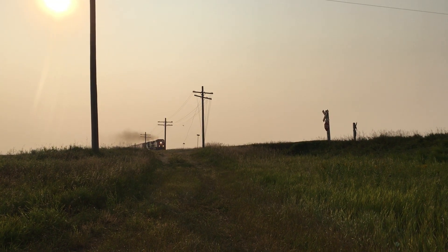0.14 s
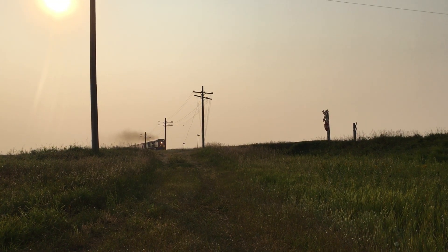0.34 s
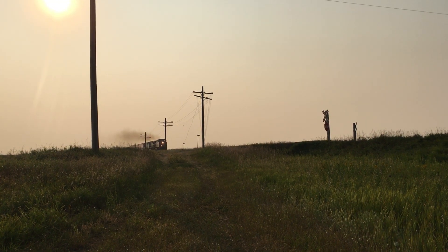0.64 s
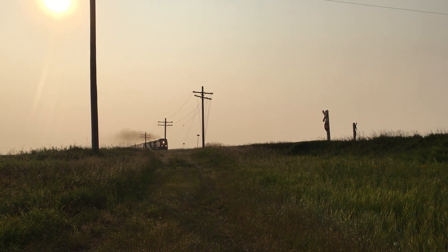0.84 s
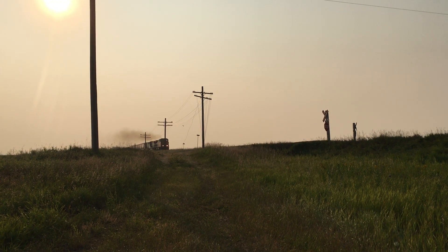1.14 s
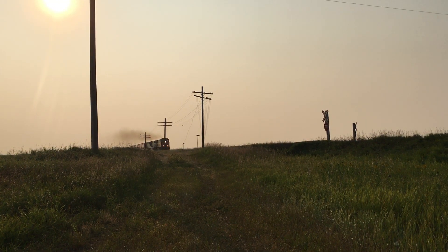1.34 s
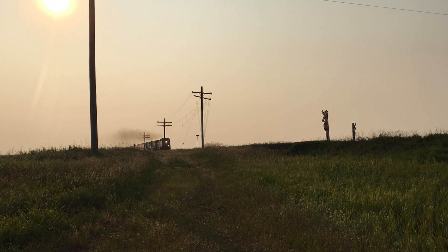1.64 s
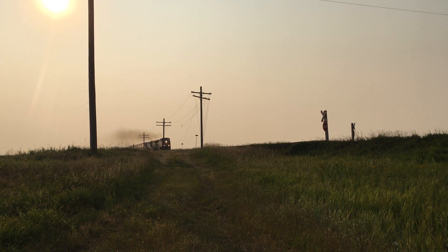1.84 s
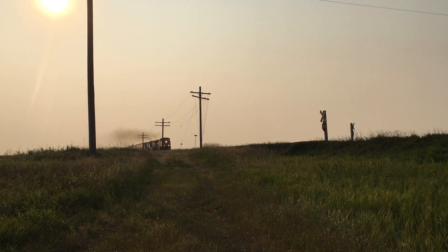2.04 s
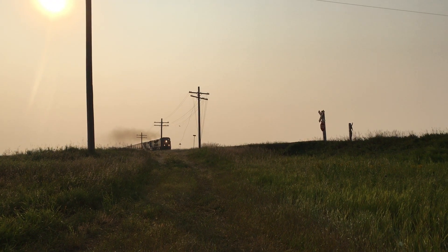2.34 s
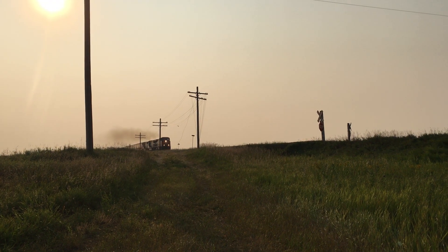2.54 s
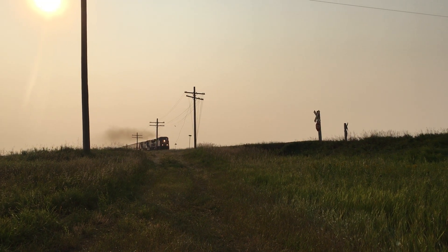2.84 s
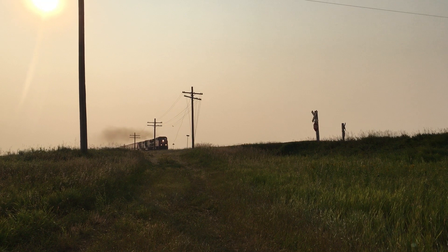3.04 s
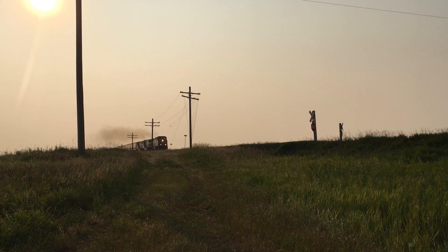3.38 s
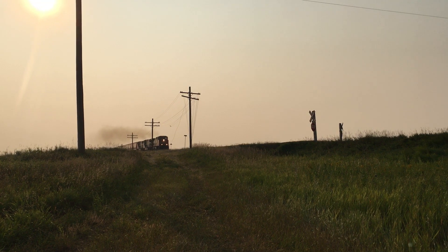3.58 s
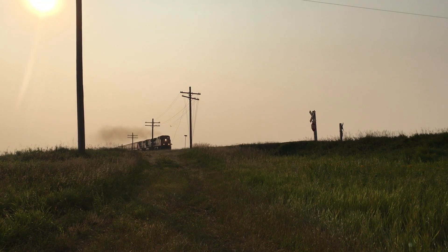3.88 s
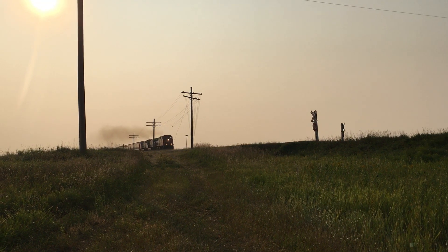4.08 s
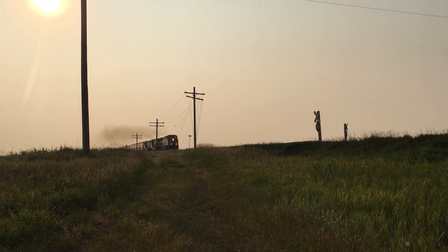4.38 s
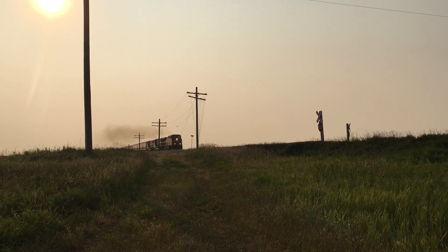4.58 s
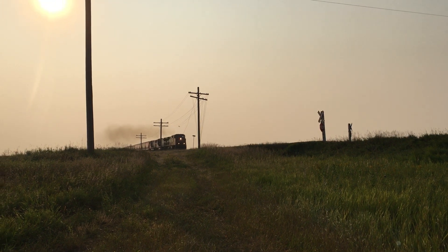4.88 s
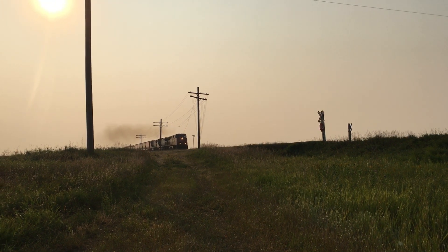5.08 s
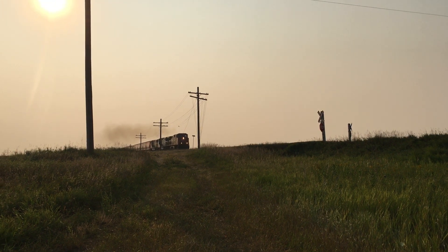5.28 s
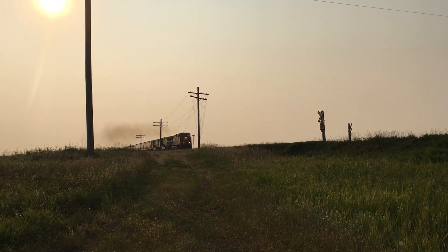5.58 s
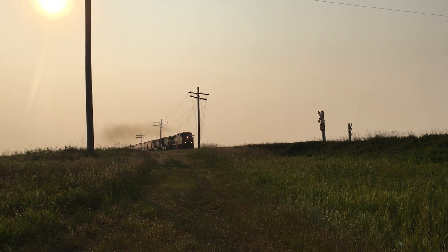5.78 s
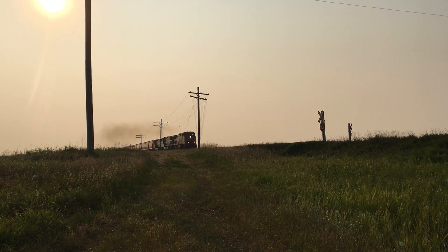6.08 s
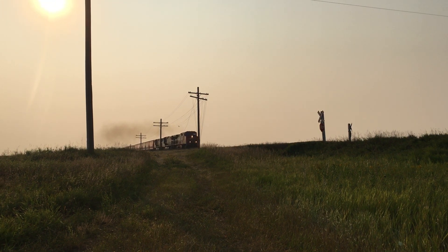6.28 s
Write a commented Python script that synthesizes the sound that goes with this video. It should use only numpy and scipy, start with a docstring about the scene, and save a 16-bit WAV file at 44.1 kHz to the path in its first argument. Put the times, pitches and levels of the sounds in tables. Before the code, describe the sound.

Deep pulsing locomotive drone and growing rail hiss approach over a field with faint insects, capped by a single echoing chord from an air horn.

```python
"""A throbbing diesel freight train nears over open grassland and sounds one blast of its three-chime horn.
The exhaust pattern repeats nine times a second as a comb of tones under roar; the drive whines faintly.
Filtered noise makes the wheel hiss on the rails and the gusts over the grass.
The horn is three rows of overtones plus rushing air, echoing off the train and the land.
Insects buzz in the grass as chopped high noise, and something ticks once close to the microphone."""
import sys
import numpy as np
from scipy import signal
from scipy.fft import rfft, irfft, next_fast_len
from scipy.io import wavfile

SR = 44100
rng = np.random.default_rng(int(sys.argv[2]) if len(sys.argv) > 2 else 0)


def log_audio(samples):
    """Write samples as a 16-bit WAV file to the path given in sys.argv[1]."""
    # one column per channel
    frames = np.atleast_2d(samples).T
    # limit to full scale, then quantise
    limited = np.clip(frames, -1, 1)
    pcm = np.round(limited * 32767).astype(np.int16)
    wavfile.write(sys.argv[1], SR, pcm)


N = 283122


def from_db(db):
    """Decibels to gain."""
    return 10 ** (np.asarray(db) / 20)


def rms_one(x):
    """Scale to an rms of 1."""
    return x / np.sqrt(np.mean(x ** 2) + 1e-20)


def seconds():
    """The time of every sample."""
    return np.arange(N) / SR


def ramp(start_s, length_s):
    """A straight rise from 0 to 1."""
    return np.clip((seconds() - start_s) / length_s, 0, 1)


def swells(rows):
    """Smooth bumps of level, in dB."""
    return sum(db * bump(s, half_s) for s, half_s, db in rows)


def bump(centre_s, half_s):
    """A bell-shaped rise and fall with a peak of 1."""
    return np.exp(-((seconds() - centre_s) / half_s) ** 2 / 2)


def drift(rate):
    """Slow chance with a spread of 1; a higher rate wanders faster."""
    pole = np.exp(-200 * np.pi * rate / SR)
    # drawn once per 100 samples, after a run-in
    draws = rng.standard_normal(N // 100 + 2002)
    slow = signal.lfilter([1], [1, -2 * pole, pole * pole], draws)[2000:]
    return np.interp(np.arange(N) / 100, np.arange(len(slow)), rms_one(slow))


def noise(colour):
    """Noise with the given spectrum, rms 1."""
    hz, db = np.transpose(colour)
    size = next_fast_len(N)
    bins_hz = np.maximum(np.arange(size // 2 + 1) * SR / size, 1)
    gain = from_db(np.interp(np.log(bins_hz), np.log(hz), db))
    return rms_one(irfft(rfft(rng.standard_normal(size)) * gain, size)[:N])


def cut(x, hz, kind, order=2):
    """Butterworth low- or high-pass."""
    return signal.sosfilt(signal.butter(order, min(hz, SR / 2 - 1), kind, fs=SR, output="sos"), x)


def ring(clicks, hz, t60):
    """A unit click sets a decaying sine of starting height 1 ringing."""
    r, w = from_db(-60 / (t60 * SR)), 2 * np.pi * hz / SR
    return signal.lfilter([0, np.sin(w)], [1, -2 * r * np.cos(w), r * r], clicks + 1e-18)


def delayed(x, lag_s):
    """The sound after a travel time that may change."""
    return np.interp(seconds() - lag_s, seconds(), x, left=0)


# the train closes in on the microphone at a steady speed
START_DISTANCE_M, SPEED_M_PER_S = 307, 21.6


def nearness_db():
    """Level gained since the start as the distance shrinks."""
    distance_m = np.maximum(START_DISTANCE_M - SPEED_M_PER_S * seconds(), 10)
    return 20 * np.log10(START_DISTANCE_M / distance_m)


# the engine cycle is steady, then picks up very slightly
CYCLE_HZ, PICKUP_AT_S, PICKUP_HZ_PER_S = 9.01, 4.0, .017


def engine_cycles():
    """Engine cycles counted since the start."""
    return np.cumsum(CYCLE_HZ + PICKUP_HZ_PER_S * np.maximum(seconds() - PICKUP_AT_S, 0)) / SR


# level at the start distance, and the dB gained per dB of nearness
THROB_DB, THROB_GROWTH = -33.5, 0.15
BARK_DB, BARK_GROWTH = -44, 1.14
# the bark and roar open up as the train clears the rise
BARK_IN_VIEW_DB, BARK_OPENS_S, BARK_OPENS_TAKES_S = 3, 4.97, 0.73
# the roar builds up: its level against the bark half way, and the whole rise
ROAR_MID_DB, ROAR_RISE_DB, ROAR_BUILD_S = -2, 5, 2.76
# the drone is centred on one multiple of the engine cycle, and this many multiples wide
DRONE_MULTIPLE, DRONE_WIDTH = 11, 1.8
# exhaust lines: multiple (of the engine cycle), level_db
ENGINE_ORDERS = [(4, -38), (5, -13), (6, -25.5), (7, -14), (8, 1.5), (9, -12.5), (10, -11), (11, 0.5),
                 (12, -1.5), (13, -4.5), (14, -24), (15, -11), (16, -4), (17, -8.5), (18, -31), (19, -9.5),
                 (20, -4), (21, -11.5), (22, -9.5), (23, -8), (24, -8.5), (25, -15.5), (26, -8.5),
                 (27, -11), (28, -7), (29, -4.5), (30, -7.5), (31, -22), (32, -29), (33, -23), (34, -6),
                 (35, -13.5), (36, -18)]
# exhaust strokes that stand out in each cycle: place (in the cycle, 0-1), level_db
STROKES = [(.063, -5), (.392, -5.5), (.472, -1.8), (.799, -.4), (.83, -5.6)]
# turbulence at the stacks: pitch_hz, level_db (per Hz)
ROAR_COLOUR = [(25, -39), (45, 5.5), (75, -2), (110, -0.5), (150, -5.5), (220, 0.5), (290, -0.5), (340, -8),
               (420, -13.5), (470, -22.5), (540, -21.5), (610, -20), (690, -26.5), (800, -41.5),
               (1300, -64)]
# the drone is weak at first and swells before the horn: centre_s, half_length_s, level_db
DRONE_SWELLS = [(.6, 1.0, -2), (3.65, 0.55, 2.5)]


def engine(waver_db=0.37, wobble=0.17, bark_wobble=0.37, spread=0.036, chuff=0.31, puff_width=0.07):
    """Unequal strokes repeat every cycle: a comb of lines, with a puff of roar on each stroke."""
    cycles = engine_cycles()
    places, strengths_db = np.transpose(STROKES)
    throb, bark = 0, 0
    for multiple, db in ENGINE_ORDERS:
        # the strokes set the timing of each line, the silencer sets its level
        turns = np.exp(-2j * np.pi * multiple * places)
        timing = np.angle(np.sum(from_db(strengths_db) * turns))
        gain = from_db(db + waver_db * drift(0.81))
        phase = 2 * np.pi * multiple * cycles + timing
        if multiple < 15:
            # the silencer smears the deep thumps into a drone
            in_drone = np.exp(-((multiple - DRONE_MULTIPLE) / DRONE_WIDTH) ** 2)
            swell = from_db(swells(DRONE_SWELLS) * in_drone)
            smeared = phase + spread * (multiple - 11) ** 2 + wobble * drift(0.88)
            throb = throb + gain * swell * np.cos(smeared)
        else:
            # the bark differs a little from one cycle to the next
            bark = bark + gain * np.cos(phase + bark_wobble * drift(4.6))
    puffs = 0
    for place, db in STROKES:
        from_stroke = (cycles - place + .5) % 1 - .5
        puffs = puffs + from_db(db) * np.exp(-(from_stroke / puff_width) ** 2 / 2)
    roar_db = ROAR_MID_DB + ROAR_RISE_DB * (ramp(0, ROAR_BUILD_S) - 0.5)
    roar = rms_one(noise(ROAR_COLOUR) * (1 + chuff * puffs)) * from_db(roar_db)
    near_db = nearness_db()
    throb_db = THROB_DB + THROB_GROWTH * near_db
    opening_db = BARK_IN_VIEW_DB * ramp(BARK_OPENS_S, BARK_OPENS_TAKES_S)
    bark_db = BARK_DB + BARK_GROWTH * near_db + opening_db
    return from_db(throb_db) * rms_one(throb) + from_db(bark_db) * (rms_one(bark) + roar)


# turbulence frays the overtones: phase noise (radians per octave above the second partial), its speed
HAZE_PER_OCTAVE, HAZE_HZ = .125, 70
# the overtones die away on a curve of this power as the valve closes
OVERTONE_FADE_POWER = 1.46
# upper edges of the registers body, steady octaves, blare, bite and brass; the edge lies above: pitch_hz
REGISTER_EDGES_HZ = [550, 900, 1400, 1750, 3100]


def chime(pitch_hz, level_db, closed, registers_db, overtones, jitter=0.00054, shimmer_db=3.0,
          top_fall_db=-1.28, smear=1.26, count=22):
    """One diaphragm and bell: a train of puffs whose high overtones shimmer in the turbulent air."""
    on = (seconds() > VALVE_OPEN_S) & (closed < 1)
    phase = 2 * np.pi * np.cumsum(pitch_hz * (1 + jitter * drift(28)))[on] / SR
    multiples, levels_db = np.transpose(overtones)
    out = np.zeros(N)
    for k in range(1, count):
        register = np.searchsorted(REGISTER_EDGES_HZ, k * pitch_hz[on].mean())
        # beyond the listed overtones the level falls steadily
        db = np.interp(k, multiples, levels_db) + top_fall_db * max(k - len(levels_db), 0)
        shimmer = shimmer_db * np.log2(k) / 2 * drift(8.8)[on]
        db = db + level_db[on] + registers_db[register][on] + shimmer
        # as the valve closes the fundamental holds on longer than its overtones
        if k == 1:
            flow = np.cos(np.pi / 2 * closed[on]) ** 2
        else:
            flow = (1 - closed[on]) ** OVERTONE_FADE_POWER
        haze = HAZE_PER_OCTAVE * max(np.log2(k) - 1, 0) * drift(HAZE_HZ)[on]
        wave = np.sin(k * phase + smear * rng.standard_normal() + haze)
        out[on] += np.sqrt(2) * flow * from_db(db) * wave
    return out


VALVE_OPEN_S, VALVE_SHUT_S = 4.32, 5.49
# air pressure in the horn: it starts low, builds up, and bleeds away as the valve closes
PRESSURE_START_DB, PRESSURE_BUILD_S, BLEED_S = -7.0, 0.13, 0.2795
# every chime starts sharp by this share of its pitch, then settles
ONSET_SHARP = .022
# the last of the air bends the chimes, the high one most
LAST_AIR_S, LAST_AIR_TAKES_S = 5.28, 0.18
# the body (the fundamentals) fills in through the blast
BODY_START_DB, BODY_BUILD_S = -1.5, 1
# the upper registers at full pressure before their swells, and the dB gained per dB of pressure
BLARE_DB, BLARE_FOLLOWS = -8.5, 0.12
BITE_DB, BITE_FOLLOWS = -4, 0.2
BRASS_DB, BRASS_FOLLOWS = -2.5, 1
EDGE_DB, EDGE_FOLLOWS = -4.4, 1
# low, middle and high chime: pitch_hz, level_db, speaks_s, fades_from_s, silent_s, settling_s,
# shift as the air bleeds away (share of pitch), shift on the last of the air (share of pitch)
CHIMES = [(324.4, -28, 4.33, 5.22, 5.54, .135, -.013, 0),
          (380, -36.5, 4.339, 5.14, 5.545, .11, -.004, 0.00061),
          (493.3, -37.5, 4.353, 5.13, 5.51, .15, -0.018, 0.029)]
# overtones of each chime: multiple (of its pitch), level_db
LOW_CHIME = [(1, 0.5), (2, -5.5), (3, -13), (4, -18), (5, -24.5), (6, -23.5), (7, -26), (8, -31), (9, -32),
             (10, -35.5), (11, -36), (12, -34.5), (13, -37.5), (14, -44.5)]
MIDDLE_CHIME = [(1, 1.5), (2, -1), (3, -9), (4, -9.5), (5, -17.5), (6, -18.5), (7, -27.5), (8, -26.5),
                (9, -31.5), (10, -24.5), (11, -32), (12, -33)]
HIGH_CHIME = [(1, 2), (2, -10.5), (3, -18.5), (4, -17), (5, -21), (6, -24.5), (7, -29), (8, -33), (9, -35)]
# air rushing through the horn: pitch_hz, level_db (per Hz)
AIR = [(300, -14), (900, -3), (1200, -12), (1450, 9.5), (1750, -6.5), (2200, 0.5), (2750, -9), (3600, -10),
       (6000, -14.5), (9000, -23.5), (16000, -41)]
# the blare wavers and swells: centre_s, half_length_s, level_db
BLARE_SWELLS = [(4.41, 0.03, -5), (4.53, 0.042, 3.5), (4.62, .025, 2.5), (4.76, 0.047, 4.5),
                (4.99, 0.1, 7.5)]
# the bite is strongest in the first half of the blast: centre_s, half_length_s, level_db
BITE_SWELLS = [(4.42, .045, 4), (4.69, .06, 3), (4.87, 0.054, 3)]
# the brass flares at the start, mid-blast and just before the valve closes: centre_s, half_length_s, level_db
BRASS_SWELLS = [(4.42, 0.04, 1.5), (4.95, 0.08, 2.5), (5.24, 0.055, 3)]
# the edge flares early and just before the valve closes: centre_s, half_length_s, level_db
EDGE_SWELLS = [(4.6, 0.057, 2.5), (5.25, 0.04, 7.5)]


def horn(steepening=1.5, air_db=-47, attack_s=0.016, sag_lead_s=0.042, sag_s=0.15):
    """Three chimes on one air valve; the loud wave steepens into sum tones, over a rush of air."""
    since_s = np.maximum(seconds() - VALVE_OPEN_S, 0)
    build_db = PRESSURE_START_DB * np.exp(-since_s / PRESSURE_BUILD_S)
    closing_s = VALVE_SHUT_S - BLEED_S
    pressure_db = build_db + 20 * np.log10(1 - ramp(closing_s, BLEED_S) + 1e-6)
    body = BODY_START_DB * (1 - ramp(VALVE_OPEN_S, BODY_BUILD_S))
    blare = BLARE_DB + BLARE_FOLLOWS * pressure_db + swells(BLARE_SWELLS)
    bite = BITE_DB + BITE_FOLLOWS * pressure_db + swells(BITE_SWELLS)
    brass = BRASS_DB + BRASS_FOLLOWS * pressure_db + swells(BRASS_SWELLS)
    edge = EDGE_DB + EDGE_FOLLOWS * pressure_db + swells(EDGE_SWELLS)
    registers_db = [body, np.zeros(N), blare, bite, brass, edge]
    sag = ramp(closing_s - sag_lead_s, sag_s)
    last_air = ramp(LAST_AIR_S, LAST_AIR_TAKES_S)
    chord = 0
    for row, overtones in zip(CHIMES, [LOW_CHIME, MIDDLE_CHIME, HIGH_CHIME]):
        hz, db, speaks_s, fades_s, silent_s, settle_s, shift, last_shift = row
        sharp = ONSET_SHARP * np.exp(-since_s / settle_s)
        pitch_hz = hz * (1 + sharp + shift * sag + last_shift * last_air)
        closed = ramp(fades_s, silent_s - fades_s)
        tone = chime(pitch_hz, db + build_db, closed, registers_db, overtones)
        chord = chord + ramp(speaks_s, attack_s) * tone
    air = ramp(VALVE_OPEN_S, attack_s) * noise(AIR) * from_db(air_db + pressure_db + brass)
    return chord + steepening * cut(chord ** 2, 900, "high") + air


def countryside(x, train_db=-9.5, train_lag_s=.05, receding=0.0044, slope_db=-19.5, slope_lag_s=1.15,
                fading_db=1.5, near_db=-10.0, near_t60=0.6, far_db=-14.5, far_t60=5.5, far_receding=0.019):
    """The cars echo slightly flat; the land behind echoes flatter and wavering, with a long tail."""
    since_s = seconds() - VALVE_OPEN_S
    # a lag that grows lowers the pitch of an echo
    off_train = from_db(train_db) * cut(delayed(x, train_lag_s + receding * since_s), 1350, "high")
    from_behind = delayed(x, far_receding * since_s)
    slope_echo = cut(delayed(from_behind, slope_lag_s), 1130, "high")
    off_slope = from_db(slope_db) * cut(slope_echo, 2100, "low")
    t = np.arange(2 * SR) / SR
    tails = []
    for source, db, t60 in [(x, near_db, near_t60), (from_behind, far_db, far_t60)]:
        scatter = rng.standard_normal(len(t)) * from_db(-60 * t / t60)
        tail = signal.fftconvolve(source, scatter / np.linalg.norm(scatter))[:N]
        tails.append(from_db(db) * cut(tail, 970, "high", order=4))
    near, far = tails
    # moving air makes the long paths fade in and out
    return x + off_train + near + (far + off_slope) * from_db(fading_db * drift(6.8))


# a rise shields the microphone from the wheels and drive until the train climbs out
SHIELD_DB, CLIMB_START_S, CLIMB_S = -7.5, 1.34, 1.83


def shield_db():
    """Level lost behind the rise, shrinking to nothing during the climb."""
    return SHIELD_DB * (1 - ramp(CLIMB_START_S, CLIMB_S))


# unshielded wheel hiss at the start distance, and the dB gained per dB of nearness
HISS_DB, HISS_GROWTH = -59.5, 1.41
# the wheels then come into a clear line over the rise
IN_VIEW_S, IN_VIEW_TAKES_S = 4.55, 1.3
# wheel noise from behind the rise, and in the clear: pitch_hz, level_db (per Hz)
HISS_FAR = [(400, 8), (900, -2.5), (1400, 0.5), (1720, -2), (2120, 7.5), (2500, -1.5), (3050, -0.5),
            (3620, 5.5), (4200, -0.5), (6300, -0.5), (7600, -5.5), (8500, -11), (10500, -16), (16000, -47)]
HISS_NEAR = [(400, 0), (850, -3.5), (1300, -0.5), (1550, 1.5), (1750, -2), (2300, 3.5), (2900, -2),
             (3800, 0.5), (5000, -3), (6300, -2), (7700, -8.5), (8600, -14.5), (11000, -17.5), (16000, -28)]


def wheels(flutter_db=1.62):
    """Steel rolls on steel: fluttering hiss whose colour changes as the train clears the rise."""
    clear = ramp(IN_VIEW_S, IN_VIEW_TAKES_S)
    level_db = HISS_DB + HISS_GROWTH * nearness_db() + shield_db()
    far = noise(HISS_FAR) * from_db(flutter_db * drift(30))
    near = noise(HISS_NEAR) * from_db(flutter_db * drift(34))
    return (np.sqrt(1 - clear) * far + np.sqrt(clear) * near) * from_db(level_db)


# the treble of the hiss pulses once per cycle: dB up and down, place of the peak (0-1), lower edge
PULSE_DB, PULSE_PLACE, PULSE_ABOVE_HZ = 1.6, .33, 3500


def pulsing(hiss):
    """The treble swells and sinks in step with the engine."""
    high_pass = signal.butter(2, PULSE_ABOVE_HZ, "high", fs=SR, output="sos")
    # filtered both ways, so the treble stays in step with the hiss
    treble = signal.sosfiltfilt(high_pass, hiss)
    pulse_db = PULSE_DB * np.cos(2 * np.pi * (engine_cycles() - PULSE_PLACE))
    return hiss + treble * (from_db(pulse_db) - 1)


# the whine's starting pitch and slow climb; its unshielded level at the start distance and growth
WHINE_HZ, WHINE_RISE_HZ_PER_S, WHINE_DB, WHINE_GROWTH = 528, 20.6, -70.5, 1.1


def whine(unsteady=0.0119, fading_db=4.0):
    """A faint wavering tone of the drive, stronger once the train climbs out from behind the rise."""
    hz = (WHINE_HZ + WHINE_RISE_HZ_PER_S * seconds()) * (1 + unsteady * drift(12))
    level_db = WHINE_DB + WHINE_GROWTH * nearness_db() + shield_db()
    tone = np.sin(2 * np.pi * np.cumsum(hz) / SR)
    return np.sqrt(2) * from_db(level_db + fading_db * drift(6.7)) * tone


# a brief rustle in the grass, then gusts that carry more of the hiss across the grass: centre_s, half_length_s,
# level_db, top_edge_hz
GUSTS = [(0.268, 0.04, -63.5, 3000), (2.8, 0.32, -72, 10000), (3.24, 0.11, -61, 14000),
         (3.52, 0.1, -55, 5000)]


def gusts(grain_db=3.0):
    """Grainy waves of hiss swell and fade."""
    out = 0
    for s, half_s, db, top_hz in GUSTS:
        hiss = noise([(900, -24), (2100, 3), (2700, -2), (3500, 7), (4500, 0.5), (6000, 3.0),
                      (9500, -4), (11000, -15), (16000, -14)])
        grains = rms_one(cut(hiss, top_hz, "low") * from_db(grain_db * drift(44)))
        out = out + from_db(db) * grains * bump(s, half_s)
    return out


# the tick and its rebound, close to the microphone: start_s, level_db, top_edge_hz
TICKS = [(2.1054, -35.5, 17000), (2.1183, -41.5, 9000)]
# what the tick rings with: pitch_hz, level_db, t60_s
TICK_MODES = [(1430, -6, .022), (1860, -8, .02), (2300, -11, .024), (2820, -17, 0.02), (3650, -21, 0.0079),
              (4300, -10, .016), (5100, -13, .014), (5740, -16, 0.016), (6900, -7, 0.0088),
              (7800, -6, 0.0096), (9500, -17, 0.0079), (13300, -8, .003)]


def tick(crack_db=-3.5, crack_s=0.0015, tail_db=-7, tail_s=0.0086, tail_hz=5500):
    """A small hard contact and its duller rebound: a crack, many short modes and a dull noisy tail."""
    clicks = np.zeros(N)
    for s, db, top_hz in TICKS:
        click = from_db(db) * (np.arange(N) == round(s * SR))
        clicks += cut(click + 1e-18, top_hz, "low")
    t = np.arange(SR // 20) / SR
    crack_burst = rng.standard_normal(len(t)) * np.exp(-t / crack_s)
    crack = signal.fftconvolve(clicks, crack_burst)[:N]
    tail_burst = rng.standard_normal(len(t)) * np.exp(-t / tail_s)
    tail = cut(signal.fftconvolve(clicks, tail_burst)[:N], tail_hz, "low")
    body = 0
    for k, (hz, db, t60) in enumerate(TICK_MODES):
        body = body + (-1) ** k * from_db(db) * ring(clicks, hz, t60)
    return cut(body + from_db(crack_db) * crack + from_db(tail_db) * tail, 1370, "high", order=4)


SONG_FADE_S = .06
# insect songs: start_s, end_s, wing_strokes_per_s, level_db
SONGS = [(-.2, .84, 26, -69), (.78, 2.26, 19.7, -71.5), (-.2, 6.6, 23.2, -75), (2.24, 3.38, 23.2, -75.5)]
# the buzz of the wings: pitch_hz, level_db (per Hz)
INSECT_COLOUR = [(8000, -40), (10100, -16), (10800, -9), (11800, -3), (13000, -5), (14500, -9),
                 (16000, -9.5)]


def insects(stroke_depth_db=9, unsteady=0.014):
    """Each insect chops a very high buzz with wing strokes at its own rate."""
    out = 0
    for start_s, end_s, strokes_per_s, db in SONGS:
        # half a sine turn per stroke
        stroke = np.pi * np.cumsum(strokes_per_s * (1 + unsteady * drift(1.2))) / SR
        chop = from_db(stroke_depth_db * np.abs(np.sin(stroke)))
        buzz = rms_one(noise(INSECT_COLOUR) * chop)
        fade_out = 1 - ramp(end_s - SONG_FADE_S, SONG_FADE_S)
        out = out + from_db(db) * buzz * ramp(start_s, SONG_FADE_S) * fade_out
    return out


STILL_AIR_DB = -67
# still air over the grass: pitch_hz, level_db (per Hz)
STILL_AIR = [(400, 2.5), (900, 4.5), (1500, 3.5), (2500, 0.5), (6000, -4.5), (9000, -37), (16000, -24)]


def still_air():
    """A faint steady bed of noise."""
    return from_db(STILL_AIR_DB) * noise(STILL_AIR)


def scene():
    """The train in the distance, the grass nearby."""
    train = engine() + whine() + pulsing(wheels() + gusts()) + countryside(horn())
    return (train + still_air() + insects() + tick())[None]


CUTOFF_HZ = 15700


def record(dry):
    """The microphone drops the deepest bass; the top is cut."""
    thin = cut(dry, 37.5, "high", order=7)
    return signal.sosfilt(signal.ellip(10, .1, 80, CUTOFF_HZ, fs=SR, output="sos"), thin)


dry = scene()
out = record(dry)
log_audio(out)
```